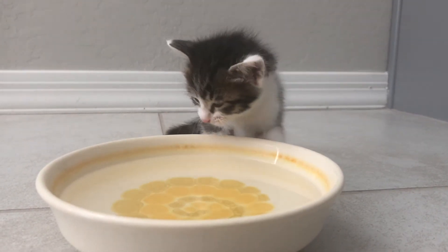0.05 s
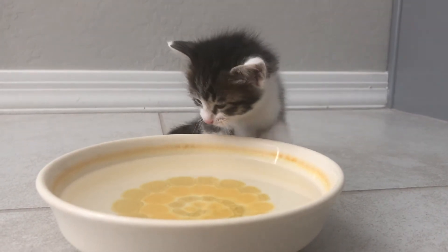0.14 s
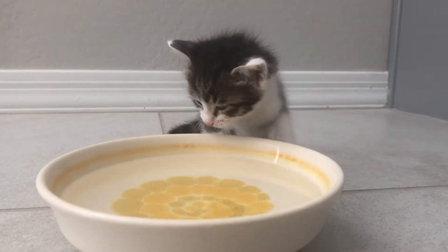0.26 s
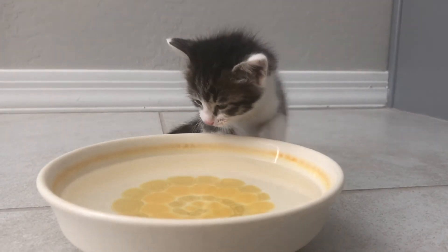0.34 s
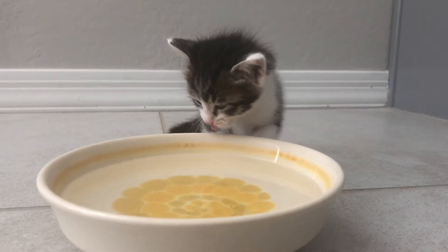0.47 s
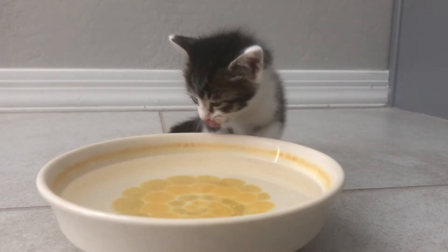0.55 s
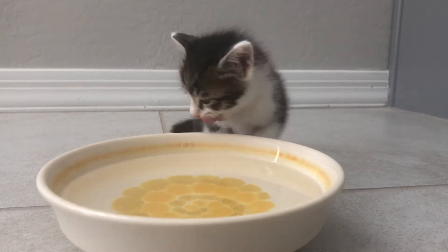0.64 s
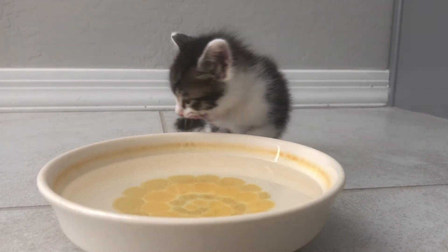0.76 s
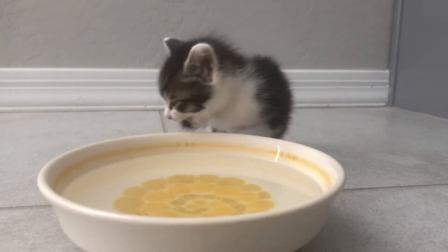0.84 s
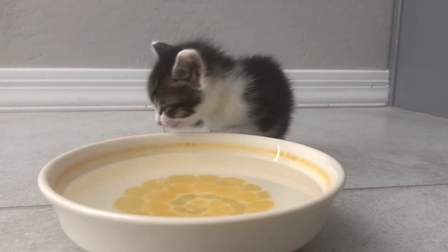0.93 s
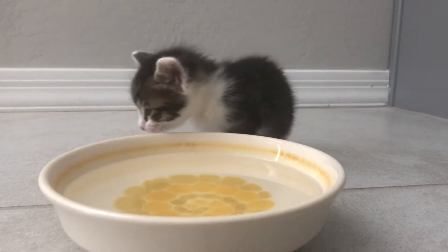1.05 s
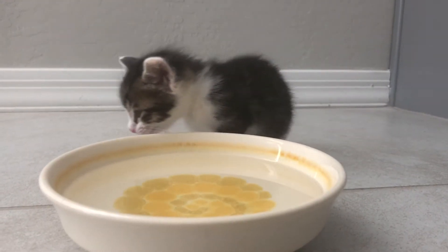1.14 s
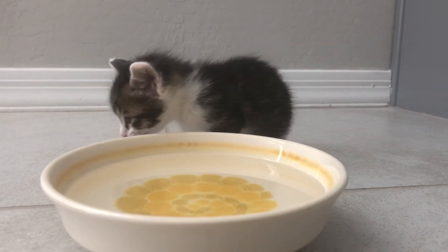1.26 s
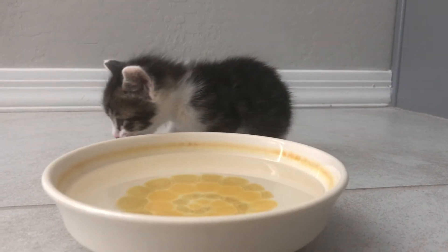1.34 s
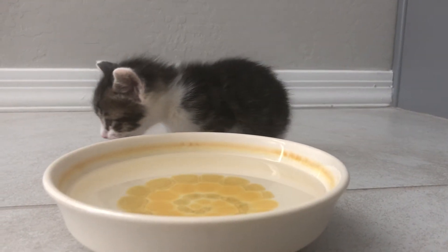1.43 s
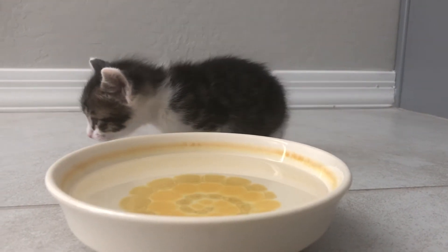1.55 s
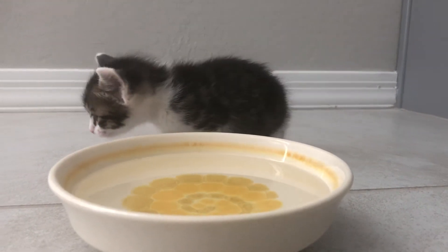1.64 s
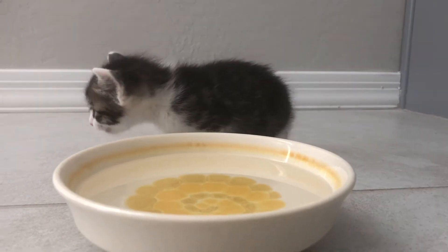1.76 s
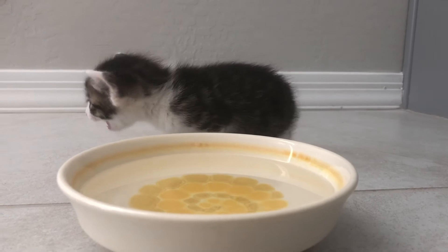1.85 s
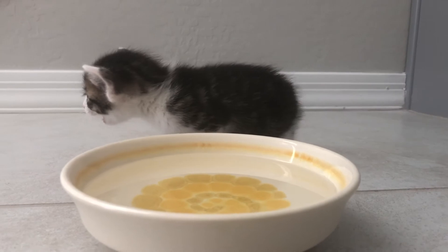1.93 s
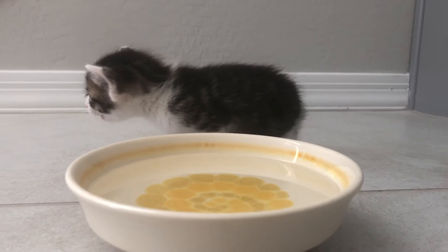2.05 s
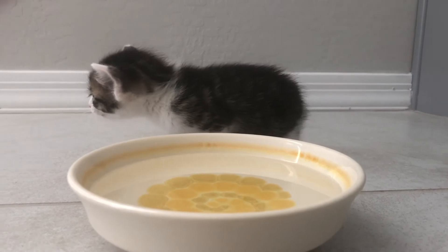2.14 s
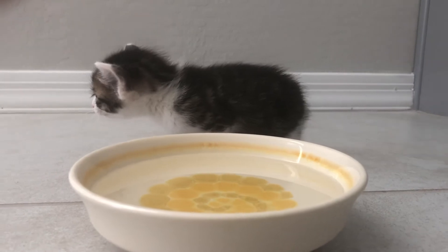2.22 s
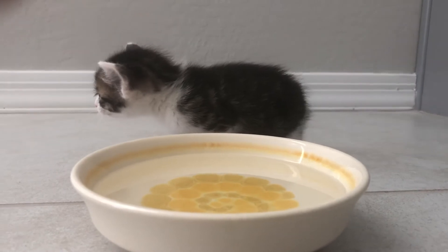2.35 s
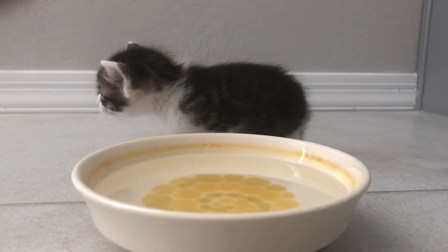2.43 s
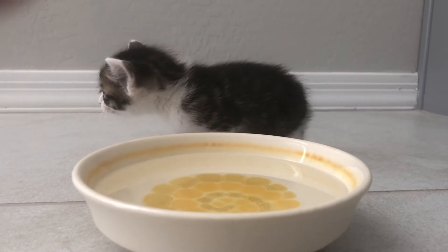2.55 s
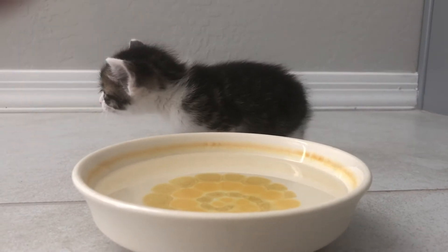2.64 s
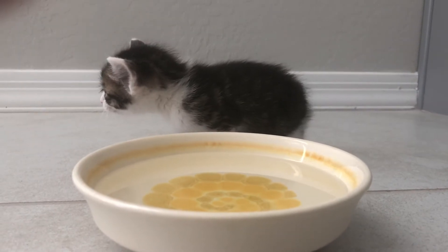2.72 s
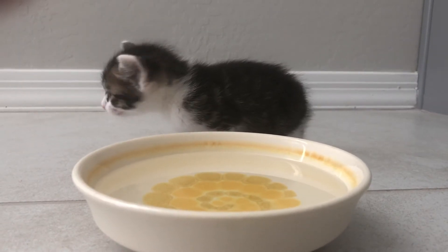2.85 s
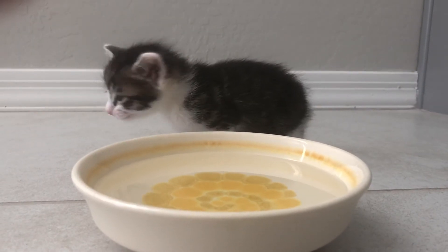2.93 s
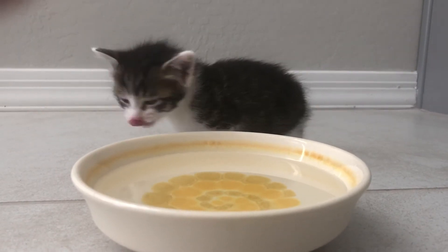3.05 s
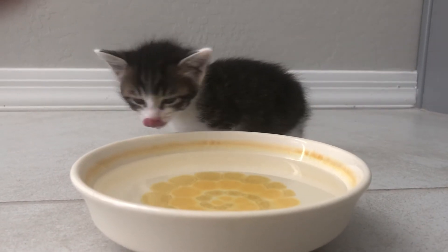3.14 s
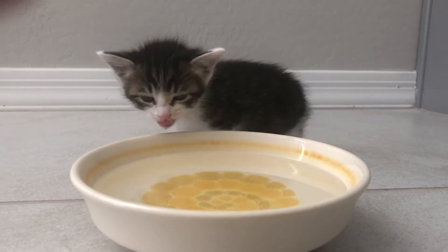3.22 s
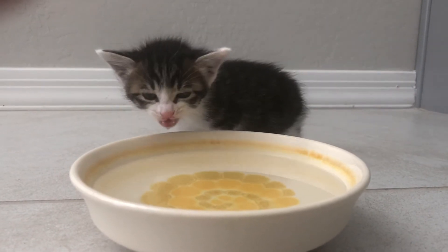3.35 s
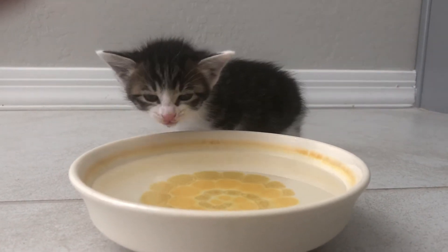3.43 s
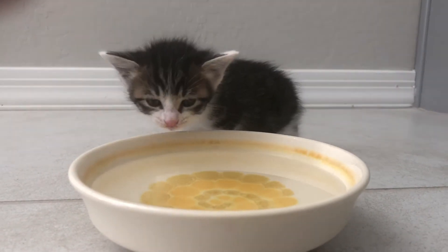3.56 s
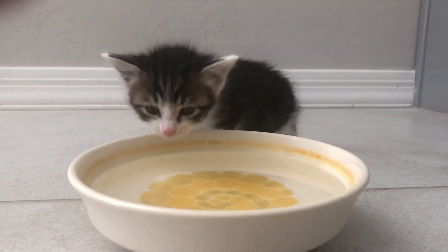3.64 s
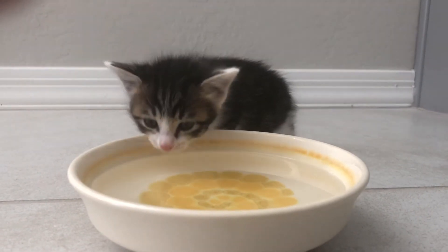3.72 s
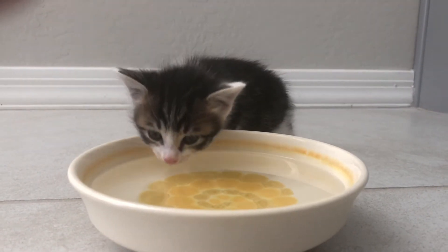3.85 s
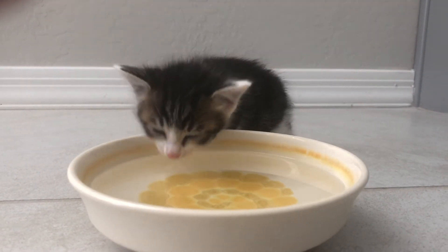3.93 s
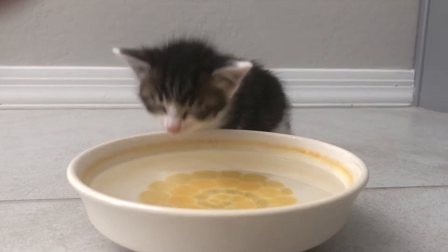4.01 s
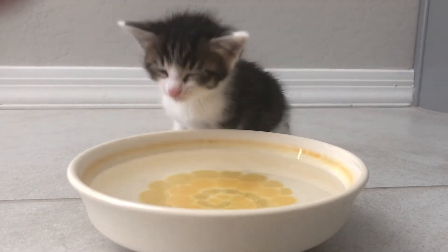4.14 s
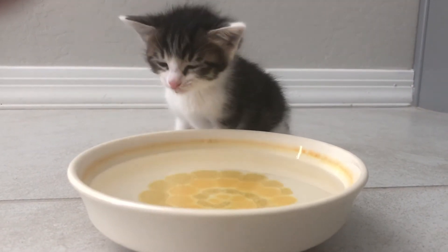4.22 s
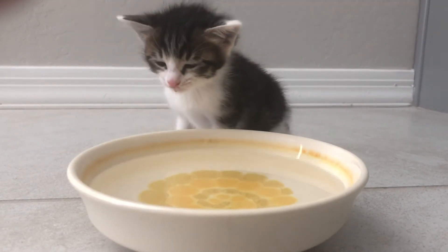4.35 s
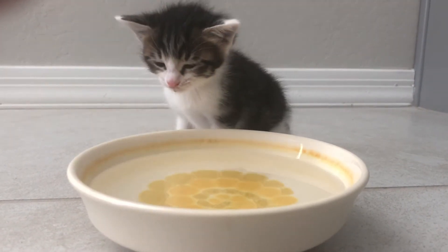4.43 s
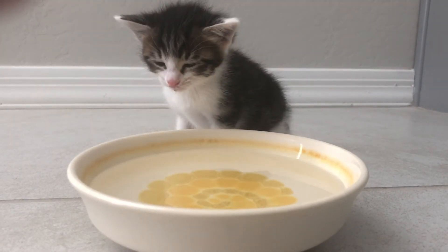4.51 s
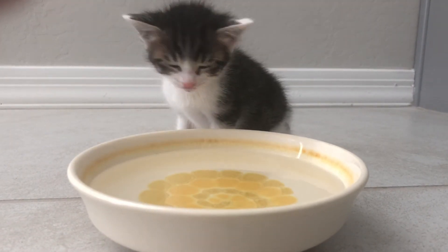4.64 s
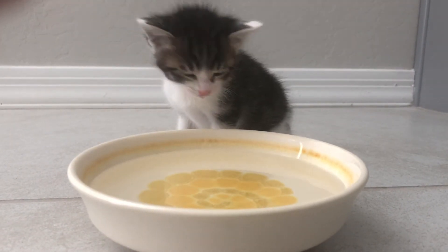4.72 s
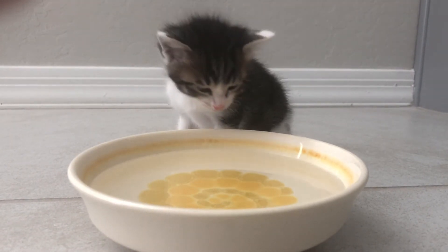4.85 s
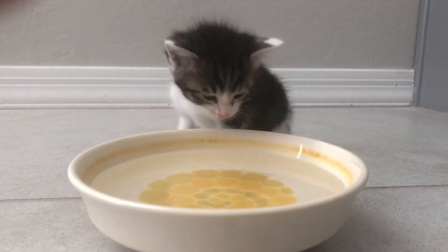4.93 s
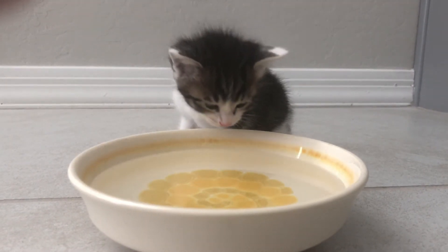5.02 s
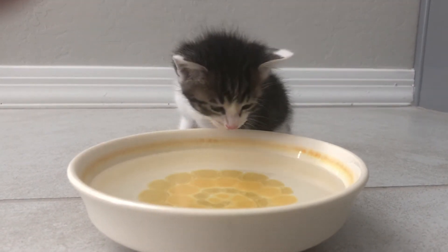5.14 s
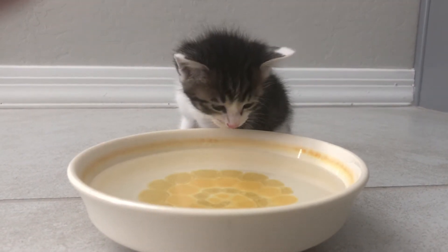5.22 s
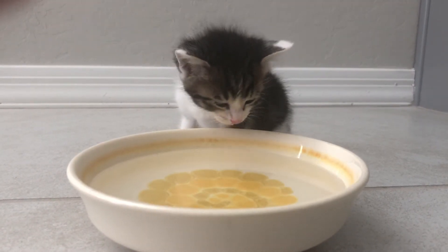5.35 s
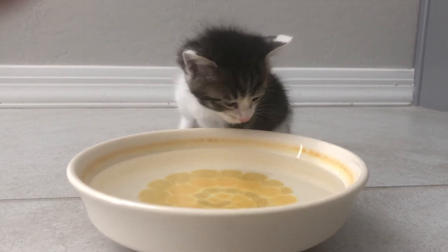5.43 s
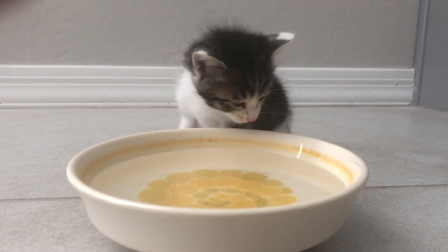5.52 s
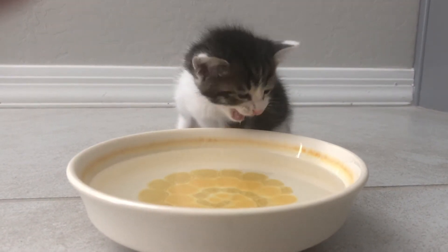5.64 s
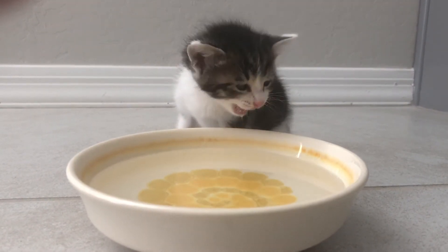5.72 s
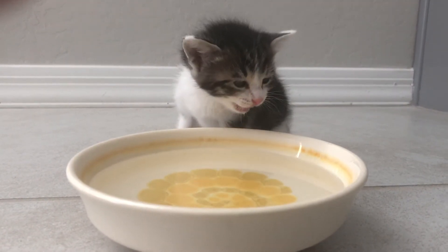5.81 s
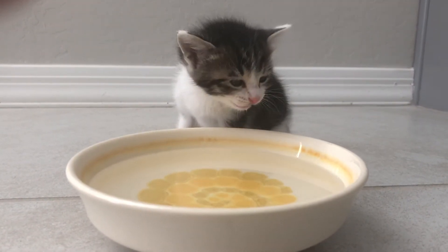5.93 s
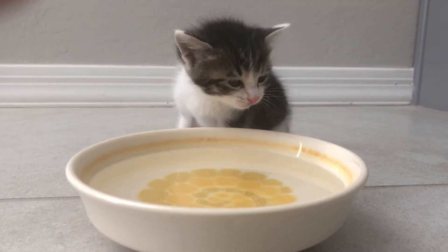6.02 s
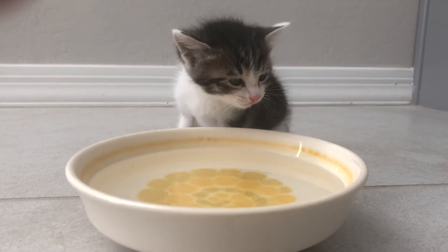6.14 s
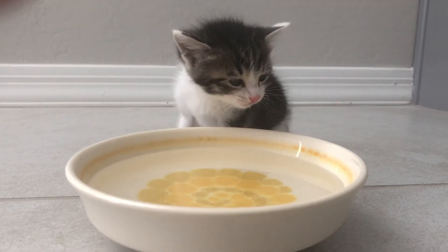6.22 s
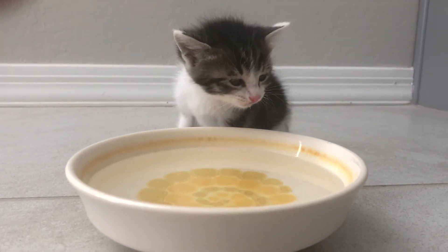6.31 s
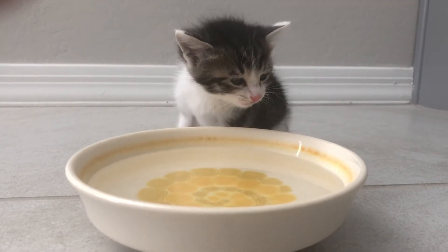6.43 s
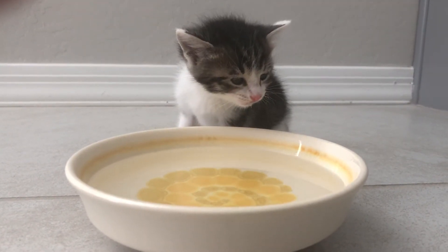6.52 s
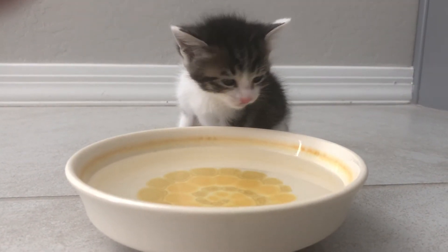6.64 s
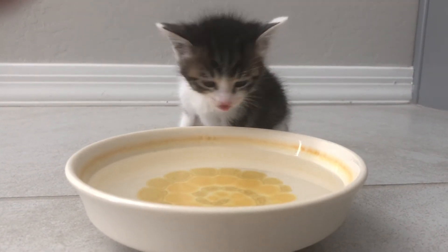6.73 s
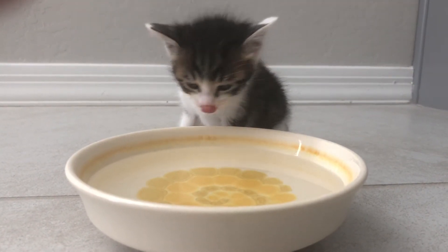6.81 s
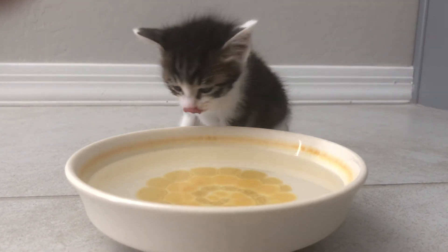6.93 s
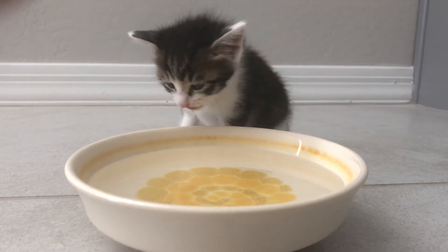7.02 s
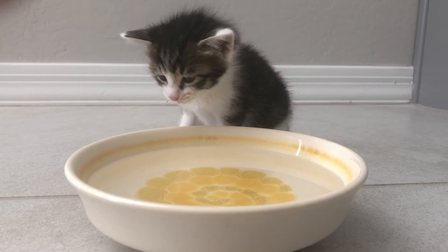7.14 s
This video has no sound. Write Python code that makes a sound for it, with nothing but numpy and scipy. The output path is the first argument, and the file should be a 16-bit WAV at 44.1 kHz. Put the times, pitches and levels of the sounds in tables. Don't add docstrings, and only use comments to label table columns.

```python
import sys
import numpy as np
from scipy import signal
from scipy.fft import rfft, irfft
from scipy.io import wavfile
from scipy.ndimage import uniform_filter1d

SR = 44100
rng = np.random.default_rng(int(sys.argv[2]) if len(sys.argv) > 2 else 0)


def nominal_scale(level):
    x = np.asarray(level, float) / 20
    return 10 ** x


def wav_record(signal):
    frames = np.transpose(np.atleast_2d(signal))
    bounded = np.clip(frames, -1, 1)
    quanta = np.round(bounded * 32767).astype(np.int16)
    wavfile.write(sys.argv[1], SR, quanta)


N = 316329
TIME = np.arange(N) / SR


def kitten():
    # (time [s], effort [dB], hum through the nose [dB],
    # mouth opening [0-1], roughness of the vocal folds [0-1])
    first_mew = [
        (1.84,-60,-48,0.57,1.0),
        (1.894,-20,-37,0.81,.25),
        (1.905,-29.5,-34,0.76,0.22),
        (1.942,-18,-37,0.82,0.51),
        (2.01,-13,-43.5,0.72,0.07),
        (2.102,-15,-47.5,0.64,0.01),
        (2.167,-21.5,-41,0.42,0.05),
        (2.19,-36,-44.5,0.3,0.09),
        (2.316,-52.5,-38,0.4,0.1),
    ]
    second_mew = [
        (3.257,-44.5,-40.5,0.24,0.18),
        (3.302,-23.5,-34.5,.7,0.046),
        (3.34,-14.5,-30.5,0.81,.07),
        (3.39,-12.5,-37.5,0.82,0.11),
        (3.43,-13.5,-27,.68,0.046),
        (3.46,-15,-32.5,0.52,0.13),
        (3.474,-26,-27,0.5,0.054),
        (3.591,-40.5,-23.5,0.32,0.039),
        (3.662,-67,-32.5,.3,0.094),
    ]
    third_mew = [
        (5.613,-50.5,-37.5,0.5,.34),
        (5.65,-23.5,-35,0.68,.13),
        (5.684,-14,-30.5,0.81,.1),
        (5.729,-9.5,-46.5,0.78,.08),
        (5.798,-9,-25,0.68,.07),
        (5.858,-12.5,-28.5,0.56,.05),
        (5.877,-19,-26.5,0.4,.07),
        (5.95,-26.5,-28.5,0.39,.12),
        (6.038,-42,-35.5,0.27,.14),
    ]
    # (time [s], pitch [Hz])
    arcs = [
        [(1.84,700),(1.898,1075),(1.943,1190),(2.0,1195),(2.1,1113),(2.16,1043),(2.205,1135),(2.275,1135),(2.3,1038)],
        [(3.255,900),(3.27,1000),(3.31,1126),(3.345,1172),(3.39,1174),(3.43,1127),(3.458,1072),(3.57,1037),(3.665,990)],
        [(5.61,900),(5.62,960),(5.66,1074),(5.69,1205),(5.725,1260),(5.762,1212),(5.81,1126),(5.86,1071),(6.03,1055)],
    ]
    # (fifth over fourth overtone [dB], resonance [Hz], its level [dB], escaping air [0-1])
    throats = [
        (-20,4750,-26,.05),
        (-13,4750,-13,.06),
        (-21,4750,-19,0.08),
    ]
    # (level [dB], resonance at half-open mouth [Hz], tilt [dB per octave])
    edges = [
        (-50,9200,2.5),
        (-41,7000,4.5),
        (-40,9920,-2),
    ]
    # (lows [dB], upper mids [dB], highs [dB])
    turns = [
        (3.5,2.5,7.5),
        (-3,9,-6),
        (-3,0,-0.5),
    ]
    direct, sent = np.zeros(N), np.zeros(N)
    for rows, arc, throat, edge, turn in zip([first_mew, second_mew, third_mew], arcs, throats, edges, turns):
        voice = mew(rows, arc, *throat, *edge)
        direct += voice
        sent += toward_room(voice, *turn)
    return direct, sent


def mew(rows, arc, fifth_db, throat_hz, throat_db, breathy, edge_db, edge_hz, tilt_db):
    rows = np.array(rows)
    start, stop = round((rows[0, 0] - .001) * SR), round((rows[-1, 0] + .008) * SR)
    t = TIME[start:stop]
    size = len(t)
    effort_db, nose_db, opening, rough = [np.interp(t, rows[:, 0], column) for column in rows[:, 1:].T]
    rough = np.clip(rough, 0, 2)

    pitch = voice_pitch(t, arc, rough)
    phase = 2 * np.pi * np.cumsum(pitch) / SR
    order = np.arange(1, 19)[:, None]
    hz = order * pitch

    mouth = hump(hz[1:4], 1100 + 2200 * opening, width_hz=306)
    throat = nominal_scale(throat_db + 11 * (opening - .5)) * hump(hz[1:4], throat_hz, width_hz=550)
    lows = np.hypot(mouth, throat)
    thin_s, settle_s, thin_db = 0.043, 0.065, 2.5
    fifth = lows[2] * nominal_scale(np.interp(t - t[0], [thin_s, thin_s + settle_s], [thin_db, fifth_db]))
    edge = bright_edge(hz[5:], effort_db, opening, edge_hz, tilt_db)
    lips_db = 69.5 * np.clip(.42 - opening, 0, 1)
    edge_db = edge_db - lips_db + .51 * effort_db
    effort = nominal_scale(effort_db)
    heights = np.vstack([nominal_scale(nose_db), effort * lows, effort * fifth, nominal_scale(edge_db) * edge])

    swell = nominal_scale([np.clip(k - 4, 0, 3) * 1.9 * drift(6.1, size) for k in range(18)])
    blur = breathy + .3 * rough
    air = np.array([1 + np.clip(k - 4, 0, 4) * blur * drift(350, size) for k in range(18)])
    waves = np.sin(order * phase + rng.uniform(0, 2 * np.pi, (18, 1)))
    tone = np.sum(heights * swell * air * waves, axis=0)
    tone = tone * nominal_scale(1.1 * drift(30, size))

    hiss_band = signal.butter(4, [6500, 15800], "band", fs=SR, output="sos")
    hiss = signal.sosfilt(hiss_band, rng.standard_normal(size))
    hiss = hiss * nominal_scale(-13.5 + edge_db - 15 * (1.5 - opening))

    shimmer = 1 + .55 * rough * drift(300, size)
    fade = np.clip(np.minimum((t - t[0]) / .002, (t[-1] - t) / .01), 0, 1)
    out = np.zeros(N)
    out[start:stop] = np.sqrt(2) * (tone + hiss) * shimmer * fade
    return out


def voice_pitch(t, arc, rough):
    # (time [s], jump [Hz], rise [s], hold [s], fall [s])
    flips = [(1.903,215,.005,.035,.005),(1.9615,105,.005,0,.005),(1.968,65,.012,0,.01),(1.987,75,.005,0,.005),(1.995,68,.016,0,.008),(2.026,-22,.02,0,.016),(2.243,50,.013,0,.032),
             (3.279,40,.003,0,.003),(3.474,47,.016,0,.05),(3.597,137,.024,.037,.021),
             (5.631,60,.004,.002,.012),(5.905,50,.045,.05,.055),(5.92,60,.015,0,.032),(5.974,90,.022,.012,.022),(6.042,-75,.014,.02,.001)]
    pitch = uniform_filter1d(np.interp(t, *np.transpose(arc)), size=300)
    pitch = pitch + uniform_filter1d(sum(flip(t, *row) for row in flips), size=60)
    return pitch * (1 + 0.059 * rough * drift(250, len(t)))


def flip(t, s, jump_hz, rise, hold, fall):
    shape = np.minimum(1 + (t - s) / rise, 1 - (t - s - hold) / fall)
    return jump_hz * np.clip(shape, 0, 1)


def bright_edge(hz, effort_db, opening, edge_hz, tilt_db):
    # (frequency [Hz], level [dB])
    colour = [(6000,4),(7000,-1),(8200,-1.5),(9500,-4),(11000,-3),(12500,-1),(14000,-3.5),(16000,-13.5)]
    slope_db = tilt_db + 1.1 * (effort_db + 15)
    edge = nominal_scale(at_hz(colour, hz) + slope_db * np.log2(hz / 10000)) * (hz < 16000)
    centre_hz = edge_hz + 4000 * (opening - .5)
    edge = edge * (0.54 + hump(hz, centre_hz, width_hz=1000))
    return edge / np.sqrt(np.sum(edge ** 2, axis=0))


def hump(hz, centre_hz, width_hz):
    return 1 / (1 + ((hz - centre_hz) / width_hz) ** 2)


def toward_room(voice, low_db, mid_db, high_db):
    hz = np.fft.rfftfreq(N, 1 / SR) + 1
    turn = [(1500, low_db), (1900, 0.0016), (2900, 0.0036), (3500, mid_db),
            (4300, high_db), (5500, high_db), (7500, -.8)]
    return irfft(rfft(voice) * nominal_scale(at_hz(turn, hz)), N)


def bowl():
    # (time [s], peak level [dB])
    touch = [
        (0.4194, -34.5),
    ]
    # (frequency [Hz], level [dB], time to fall 60 dB [s])
    modes = [(1865,-20,0.45),(3112,-4.5,0.33),(4100,-17,0.082),(4545,-5.5,0.11),(5750,-21,.15),(6169,-4.5,0.061),(6800,-13,0.2),(8500,-24,.1),(10030,-16,.15),(12260,-12,.12),(13200,-19,.08),(14800,-14.5,.06)]
    (s, peak_db), = touch
    click = np.zeros(N)
    click[round(s * SR)] = nominal_scale(peak_db)
    ringing = sum(nominal_scale(db) * ring(click, hz, t60) for hz, db, t60 in modes)
    return nominal_scale(-8.5) * ringing + 0.5 * np.gradient(click)


def ring(clicks, hz, t60):
    r, w = nominal_scale(-60 / (t60 * SR)), 2 * np.pi * hz / SR
    return signal.lfilter([0, np.sin(w)], [1, -2 * r * np.cos(w), r * r], clicks + 1e-18)


def smacks():
    # (time [s], peak level [dB], centre [Hz], width [octaves], time to fall 60 dB [s])
    puffs = [(.473,-58,5500,.5,.01),(.510,-53,7000,1.0,0.0074),(.633,-56,3500,1.5,.01),(1.182,-44,6000,0.75,0.0087),(1.306,-50,1100,1.5,0.022),(1.661,-53,1391,1.577,0.012),(1.784,-44.5,9040,1.2,0.014),(1.833,-49.5,11000,1.2,0.011),(1.851,-47.5,4530,1.5,0.0077),(3.257,-43.5,1500,1.5,.02),(3.279,-29.5,2250,.6,.015),(3.28,-47.5,9000,.5,.015),(5.604,-49,7000,.8,0.008),(5.614,-44.5,7000,1.0,0.018),(6.015,-28,1700,0.6,0.03),(6.77,-61.5,14500,.4,0.0062),(6.814,-62,12000,.8,0.0072),(6.8355,-48,10900,1.5,.008),(6.8405,-43.5,8700,2.0,0.0084)]
    out, t = np.zeros(N), TIME[:2000]
    for s, peak_db, hz, octaves, t60 in puffs:
        low, high = hz / 2 ** (octaves / 2), min(hz * 2 ** (octaves / 2), 19000)
        band = signal.butter(2, [low, high], "band", fs=SR, output="sos")
        puff = signal.sosfilt(band, rng.standard_normal(2000) * nominal_scale(-60 * t / t60))
        start = round(s * SR)
        out[start:start + 2000] += nominal_scale(peak_db) * puff / np.abs(puff).max()
    return out


def room(x):
    # (frequency [Hz], time to fall 60 dB [s], level [dB])
    echo = [(498,.8,-22.5),(1100,1.2,-12),(1580,1.86,-7),(2250,1.097,-11),(2860,0.44,-15),(3500,1.05,-13),(4560,1.05,-11.5),(6400,0.35,-13.5),(7500,0.49,-9),(10000,0.52,-9.5),(15000,.3,-18.5)]
    t, tail = TIME[:80000], 0
    edges = 300 * 2 ** np.arange(0, 6, 1 / 3)
    for low, high in zip(edges, edges[1:]):
        hz = np.sqrt(low * high)
        sos = signal.butter(2, [low, high], "band", fs=SR, output="sos")
        band = signal.sosfilt(sos, rng.standard_normal(len(t)))
        fall_db = -60 * t / at_hz(echo, hz)
        linger = nominal_scale(-14 + fall_db / 1.52)
        fall = (nominal_scale(fall_db) + linger) * np.clip((t - .004) / 0.005, 0, 1)
        tail = tail + nominal_scale(at_hz(echo, hz, axis=2)) * band * fall / np.sqrt(np.sum(fall ** 2))
    return signal.fftconvolve(x, tail)[:N]


def background():
    # (frequency [Hz], level [dB per Hz])
    rumble = [(15, -35.5), (25, -16.5), (53, 3), (92, -5.5), (123, -3.5), (149, -12), (270, -2),
              (354, -12.5), (384, -7), (416, -13.5), (962, -24.5), (2410, -32.5), (2610, -35.5),
              (7510, -43), (16000, -51.5)]
    # (frequency [Hz], level [dB rms])
    hum = [(59.2, -62.5), (118.4, -66), (177.6, -68), (263.8, -65.5), (355.3, -67)]
    # (frequency [Hz], level [dB rms])
    whine = [(2083,-83.5),(2358,-89),(2476,-86.5),(7224,-93.5)]
    noise, edges = 0, 22 * 2 ** np.arange(0, 9.7, 1 / 3)
    white = rng.standard_normal((2, N + 20000))
    for k, (low, high) in enumerate(zip(edges, edges[1:])):
        sos = signal.butter(2, [low, high], "band", fs=SR, output="sos")
        band = signal.sosfilt(sos, white[k % 2])[20000:]
        noise = noise + nominal_scale(at_hz(rumble, np.sqrt(low * high))) * band
    tones = np.zeros(N)
    for hz, db in [*hum, *whine]:
        wave = np.sin(2 * np.pi * hz * TIME + 0.37 * drift(2.3))
        tones += nominal_scale(db + 2.0 * drift(3)) * np.sqrt(2) * wave
    return nominal_scale(-53) * nominal_scale(.4 * drift(2)) * rms_one(noise) + tones


def drift(rate, size=N):
    r = np.exp(-2 * np.pi * rate / SR)
    noise = rng.standard_normal(size + 20000)
    return rms_one(signal.lfilter([1], [1, -2 * r, r * r], noise)[20000:])


def rms_one(x):
    return x / np.sqrt(np.mean(x ** 2) + 1e-30)


def at_hz(points, hz, axis=1):
    table = np.array(points)
    return np.interp(np.log(hz), np.log(table[:, 0]), table[:, axis])


def scene():
    direct, sent = kitten()
    small = bowl() + smacks()
    return (direct + small + room(sent + nominal_scale(-7) * small) + background())[None]


def low_pass(x):
    return signal.sosfilt(signal.butter(12, 16510, fs=SR, output="sos"), x)


def record(dry):
    mix = signal.sosfilt(signal.butter(3, 33, "high", fs=SR, output="sos"), dry)
    mix = signal.sosfilt(signal.cheby2(12, 60, 17200, fs=SR, output="sos"), mix)
    return low_pass(mix)


dry = scene()
out = record(dry)
wav_record(out)
```